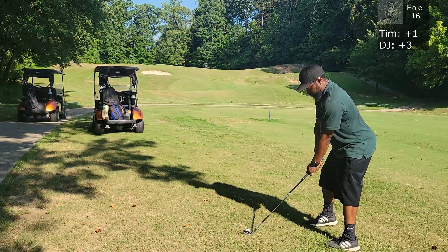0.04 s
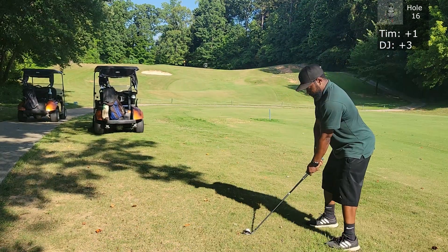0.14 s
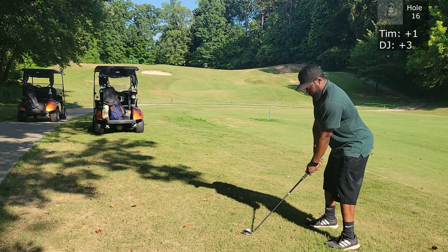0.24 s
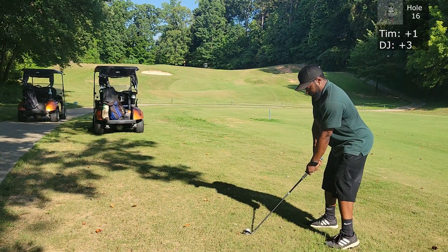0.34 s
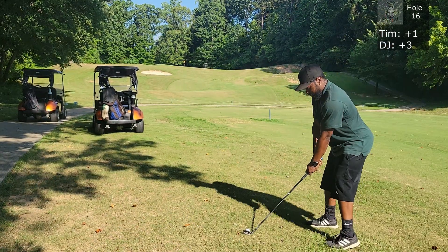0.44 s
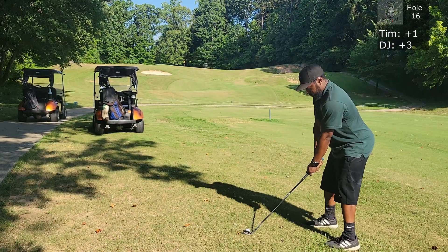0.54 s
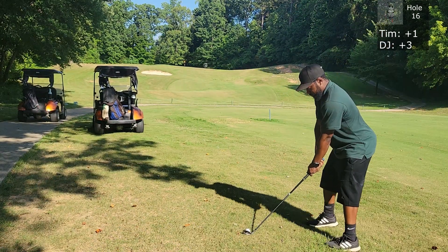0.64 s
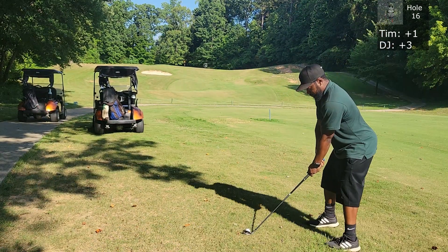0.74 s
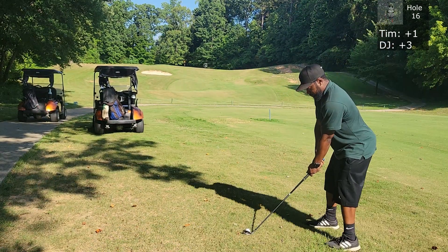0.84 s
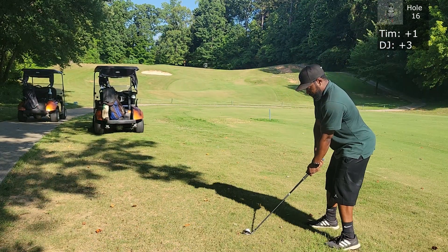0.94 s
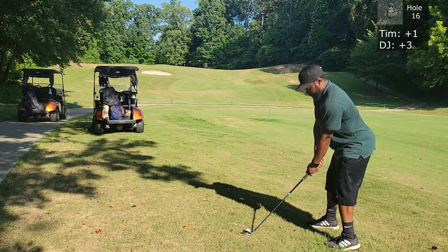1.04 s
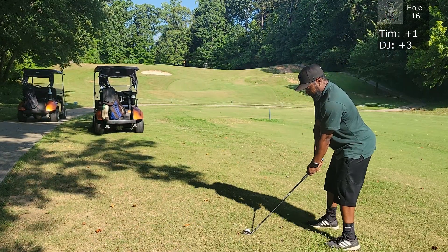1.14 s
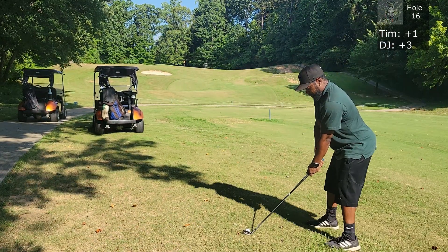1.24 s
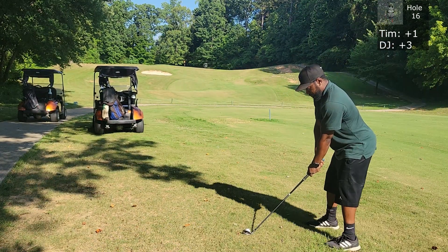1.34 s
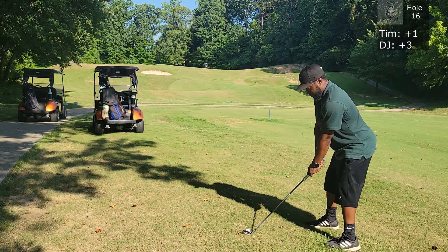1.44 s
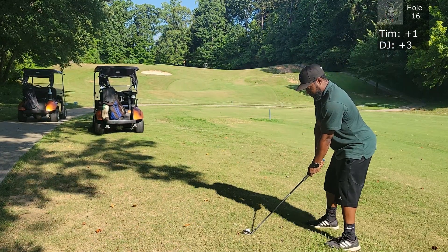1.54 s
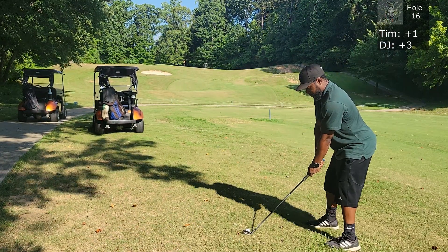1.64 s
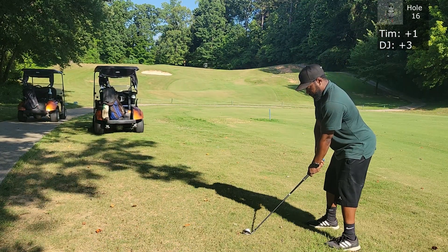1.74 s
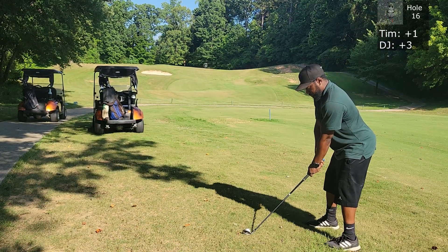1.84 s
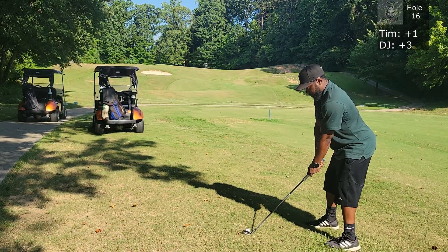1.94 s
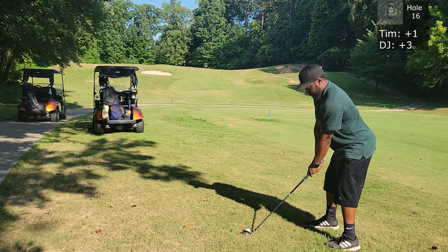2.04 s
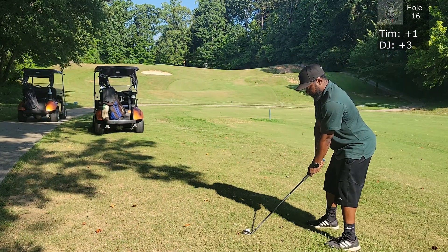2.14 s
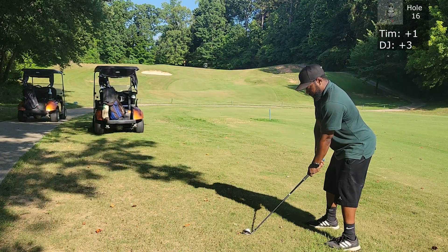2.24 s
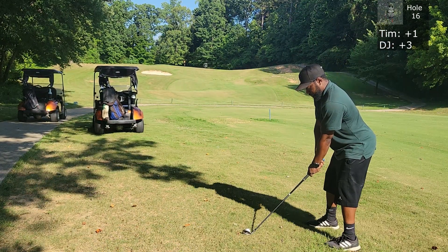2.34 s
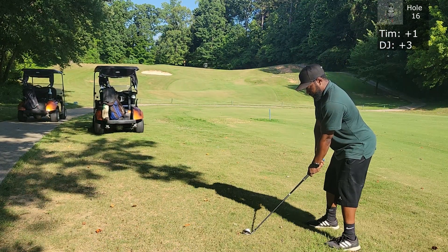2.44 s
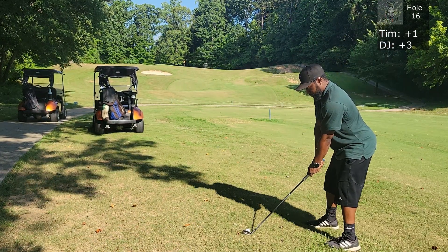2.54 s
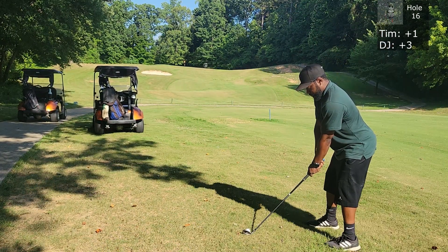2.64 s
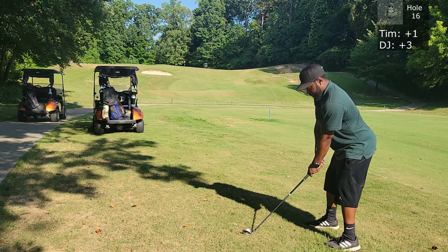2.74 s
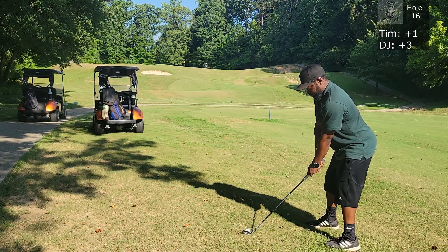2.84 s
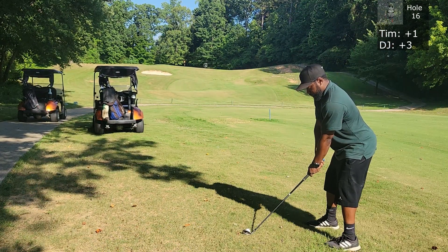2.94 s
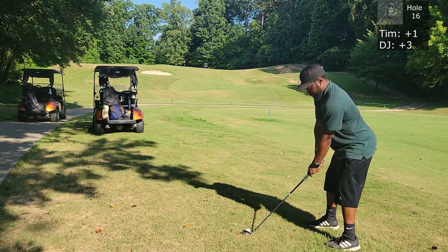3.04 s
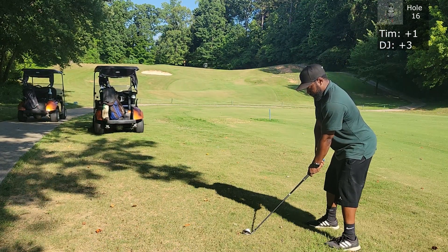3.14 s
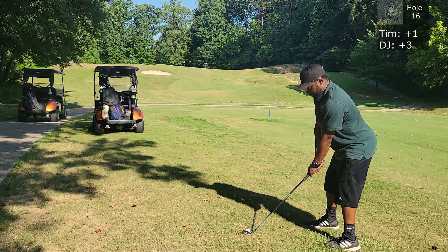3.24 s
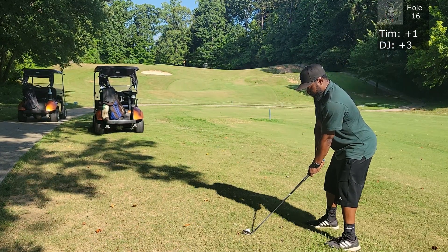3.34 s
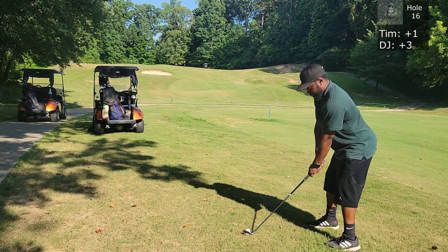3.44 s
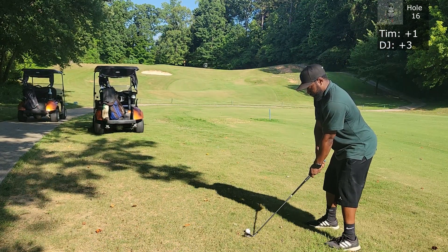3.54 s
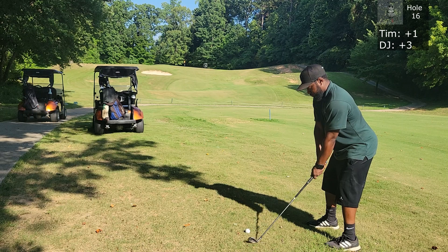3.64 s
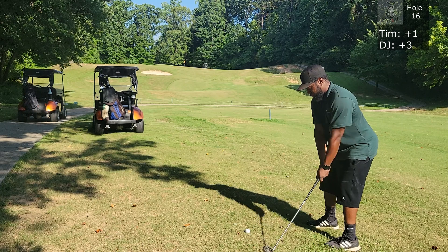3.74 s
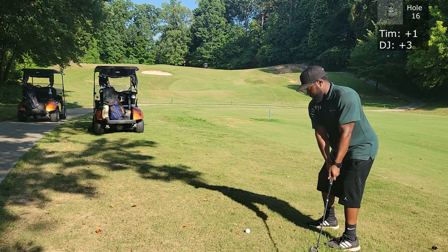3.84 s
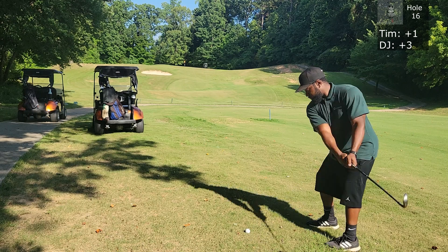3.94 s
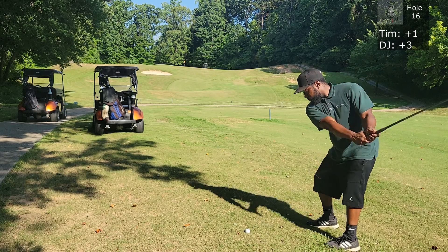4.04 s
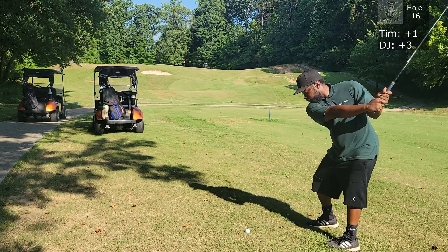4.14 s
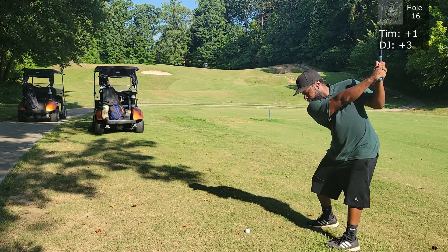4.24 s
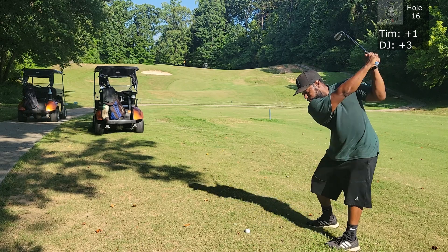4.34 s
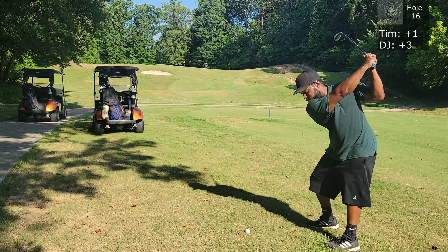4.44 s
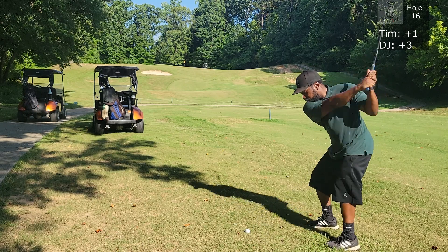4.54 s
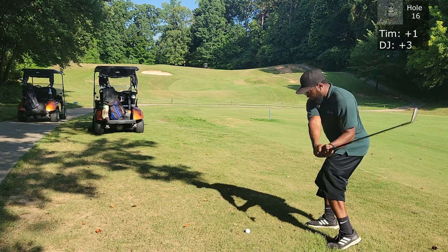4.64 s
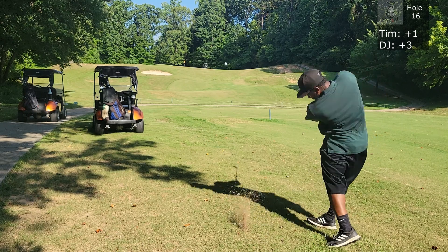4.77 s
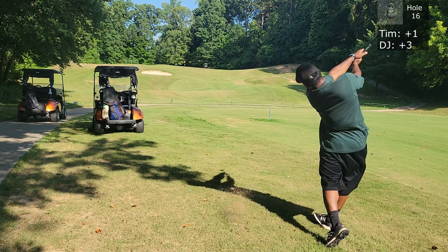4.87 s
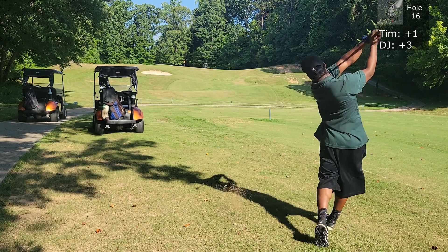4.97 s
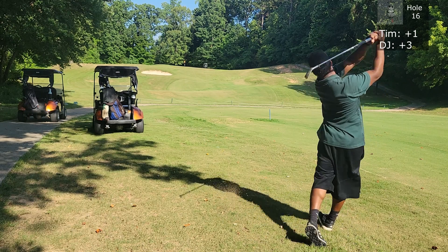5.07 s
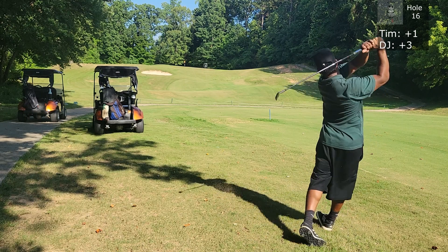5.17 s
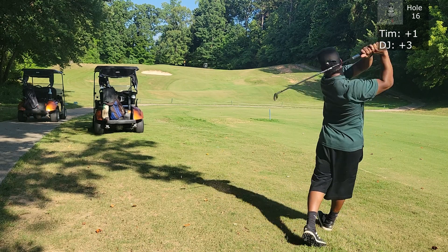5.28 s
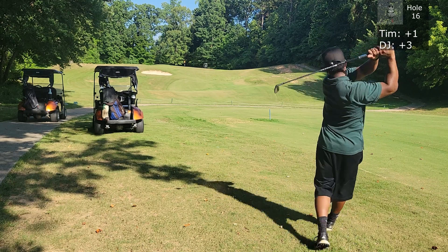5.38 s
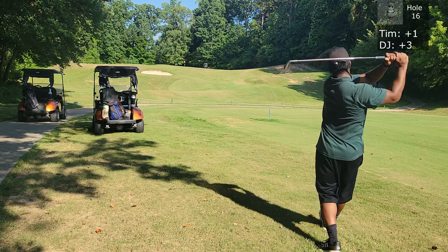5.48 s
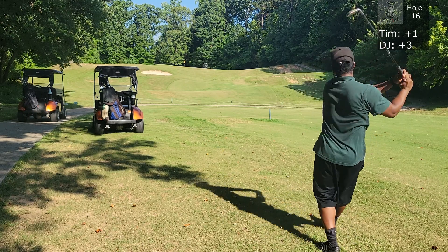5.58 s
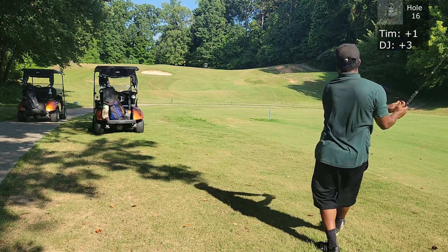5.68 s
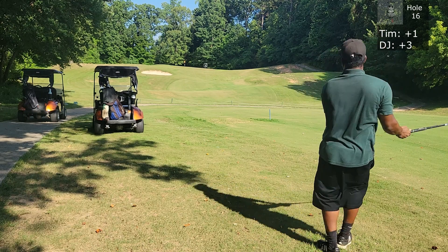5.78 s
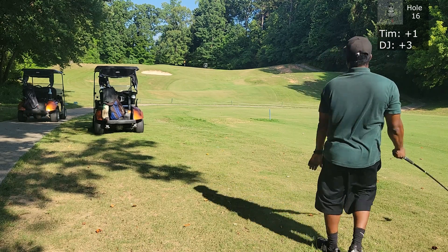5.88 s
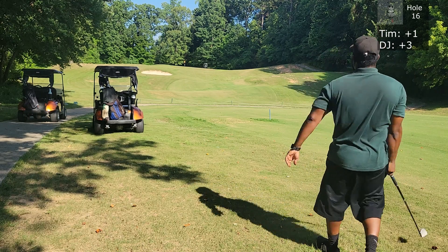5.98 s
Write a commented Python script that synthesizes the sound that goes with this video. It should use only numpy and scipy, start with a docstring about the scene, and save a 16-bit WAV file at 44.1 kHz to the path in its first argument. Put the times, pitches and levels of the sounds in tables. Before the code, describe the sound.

A golf iron swishes and cracks a ball off the turf, over summer insects, leaves and a faint idling engine.

```python
"""An iron strikes a golf ball off turf: the shaft sheds eddies and swishes, the impact rings the face with a
crack that the trees scatter back, the divot sprays, and air fizzes over the leaving ball. Around the summer
fairway a small engine idles far off, a cicada's tymbals swell on the right, a katydid's wings tick and buzz on
the left while a farther one buzzes between its songs, and leaves and a distant insect chorus hiss. One soft tap
on the grass comes before the swing."""
import sys
import numpy as np
from scipy import signal
from scipy.fft import rfft, irfft, next_fast_len
from scipy.io import wavfile
from scipy.ndimage import map_coordinates

SR = 44100
rng = np.random.default_rng(int(sys.argv[2]) if len(sys.argv) > 2 else 0)


def unload_audio(sound):
    """Save the sound as a 16-bit wav file, at the path given as the first command line argument."""
    columns = np.transpose(np.atleast_2d(sound))
    # keep every value between -1 and 1, then stretch to whole-number steps
    steps = np.round(np.clip(columns, -1, 1) * 32767)
    wavfile.write(sys.argv[1], SR, steps.astype(np.int16))


N = 265041
T = np.arange(N) / SR

# Coherence of a diffuse field at the two microphones: f/Hz, coherence
DIFFUSE_COHERENCE = [(60, 0.89), (300, 0.64), (1000, 0), (3000, 0), (8000, 0.0015)]
# Spectrum of leaves and far insects: f/Hz, relative level/dB
LEAF_SPECTRUM = [(120, -21), (200, -3.5), (223, -14), (366, -10.5), (464, -14), (929, -14), (2150, -22),
                 (3660, -22.5), (4810, -21.5), (6690, -25.5), (7890, -14.5), (9300, -36), (10200, -40.5),
                 (14200, -30), (15800, -35)]
# Balance of the leaves: f/Hz, left minus right/dB
LEAF_BALANCE = [(60, -1.0), (110, -6), (200, 0), (380, -3.5), (700, 0.5), (1290, -2), (2380, -0.5),
                (4400, -3), (8120, -1.5), (15000, 4)]
# Bands of a distant drone: f/Hz, width/Hz, gain per filter pass/dB
DRONE_BANDS = [(362, 116, -3), (780, 196, 1), (1203, 113, 0.5)]
# Bands of far cicadas: f/Hz, width/Hz, gain per filter pass/dB
CHORUS_BANDS = [(7025, 79, 9), (8044, 1010, 6.5)]
# Engine harmonics: multiple of the cycle rate, relative level/dB
ENGINE_ORDERS = [(4, -24), (5, -25), (6, -13), (7, -11), (8, -22), (9, 0), (10, -5), (11, -22), (12, -12),
                 (13, -18), (14, -17), (15, -20), (16, -16), (17, -24), (18, -15), (19, -22), (20, -17),
                 (21, -21), (22, -20), (24, -23)]
# Spectrum of the engine's rumble: f/Hz, relative level/dB
RUMBLE_SPECTRUM = [(20, -26), (35, -10), (55, -2.5), (80, 1.5), (120, -8.5), (190, -15), (240, -18.5),
                   (300, -41)]
# Slow drift of the idle: t/s, gain/dB
IDLE_GAIN = [(0, -47), (1.3, -47), (2.1, -46), (3.2, -48), (4.3, -48.5), (4.6, -47), (6.01, -47.5)]
# Katydid ticks, in quickening runs: t/s
TICK_TIMES = [.385, .4733, .5467, .609, .6669, .73, .7894, .865, 2.0228, 2.1045, 2.1939, 2.2623, 2.3236,
              2.393, 2.4558, 2.5178, 2.5726, 4.0761, 4.145, 4.2113, 4.275, 4.3331, 4.3909, 4.446, 4.504,
              4.5597]
# Katydid buzzes, the third from a farther katydid: start/s, rise/s, hold/s, level/dB
WING_BUZZES = [(.05, 1.0, .58, -64), (2.1, 0.46, 0.51, -65), (2.7, .3, 1.6, -68), (4.4, .45, .66, -64),
               (5.79, 0.019, .08, -64), (5.96, .02, .2, -63.5)]
# Spectrum of the katydid's wings: f/Hz, relative level/dB
WING_SPECTRUM = [(8500, -48), (10000, -20), (12000, -10), (13800, -3), (15700, -3.5), (15850, -99)]
# Resonances of the cicada's body: f/Hz, width/Hz, gain per filter pass/dB
CICADA_MODES = [(4010, 550, -2.5), (4900, 404, -0.5), (5570, 435, 1), (6025, 300, 0.5), (6520, 400, -3.5)]
# One cicada swell: t from the crest/s, level relative to the crest/dB, pulse rate/Hz
CICADA_SWELL = [(-.53, -16, 58), (-.36, -4.5, 69), (-.13, 0.5, 69), (0, -0.5, 75), (.1, -7.5, 73),
                (.33, -11.5, 70), (.45, -19, 94)]
# Crests of the swells: t/s, level/dB
CICADA_CRESTS = [(.26, -55.5), (1.42, -55), (2.56, -55), (3.68, -55), (4.82, -54.5), (5.97, -55)]
# Soft contact with the grass: t/s, level/dB, f/Hz
GRASS_TAPS = [(2.2, -35, 486)]
# Reverberation time of the tree line: f/Hz, T60/s
TREE_DECAY = [(200, 0.45), (2000, 0.67), (8000, 0.31), (16000, 0.3)]
# Spectrum of flying soil: f/Hz, relative level/dB
SOIL_SPECTRUM = [(530, -33), (900, -16), (1250, -15), (1420, -17.5), (3110, -3), (3380, -6.5), (3770, -7),
                 (6250, -11), (8550, -18), (13500, -17), (16000, -20)]
# Modes of club face and ball: f/Hz, level/dB, T60/s
FACE_MODES = [(680, -11.5, .028), (1050, -29, .03), (1250, -30, .02), (1900, -28, .02), (2450, -20, .022),
              (3400, -28, .008), (5000, -12, .004), (8100, -13, .003)]
# Reflections off ground and player: delay/s, left gain/dB, right gain/dB
REFLECTIONS = [(.0022, -20, -12), (.0032, -5.5, -20), (.0058, -17, -20)]

TOP_HZ, AIR_TOP_HZ = 16995, 15850  # band limits: whole scene; divot and tree echo
ENGINE_CYCLE_HZ = 9.03
BUZZ_HZ, BUZZ_RISE_DB, BUZZ_FALL_DB_PER_S = 53.2, 10.5, 150
TICK_DB, TICK_HOLD_S, TICK_T60 = -63, .006, .025
DIVOT_S, DIVOT_DB, DIVOT_HOLD_S, DIVOT_T60 = 4.797, -36.5, 0.024, 0.28
SETTLE_DB, SETTLE_T60 = -11.5, 0.97  # the divot's slow tail, relative to its burst
FIZZ_S, FIZZ_DB, FIZZ_RISE_S, FIZZ_HOLD_S, FIZZ_T60 = 4.808, -44, .012, .018, 0.38
FIZZ_HZ, SAG_HZ_PER_S = 3030, 2000
SPEED_UP_S, SPEED_KEPT, SLOW_DOWN_S = .15, .86, .2  # club speed before, at and after impact
EDDY_HZ, EDDY_DB, HISS_DB = 664, -41.5, -34.5  # at full speed; hiss level per band
EDDY_DB_PER_DECADE, HISS_DB_PER_DECADE = 30, 118  # growth with speed
PASS_S, SWUNG_PAST_DB = 0.031, -3.5  # time from impact for 1 dB of distance loss; step after impact
STRIKE_S = 4.7937
THUD_DELAY_S, THUD_HZ, THUD_WIDTH_S, THUD_DB = .0046, 200, .0022, -22.5


def amp(db):
    """Amplitude ratio of a level in dB."""
    return 10 ** (np.asarray(db) / 20)


def unit(x):
    """x normalised to rms 1."""
    return x / np.sqrt(np.mean(x ** 2) + 1e-20)


def pan(db):
    """Left and right gains for a left-minus-right level difference."""
    return amp([[db / 2], [-db / 2]])


def spectrum(table, hz):
    """Gain at hz, interpolated between (f/Hz, level/dB) points; silent outside them."""
    f, db = np.transpose(table)
    return amp(np.interp(np.log(hz + 1), np.log(f + 1), db, -120, -120))


def resonances(table, hz):
    """Response at hz of superposed damped resonators (f/Hz, width/Hz, gain/dB), alternating in sign."""
    return sum((-1) ** k * amp(db) * 1j * hz * width / (centre ** 2 - hz ** 2 + 1j * hz * width)
               for k, (centre, width, db) in enumerate(table))


def curves(rows):
    """Each column after the time, interpolated to one value per sample."""
    times, *columns = np.transpose(rows)
    return [np.interp(T, times, column) for column in columns]


def wobble(rate):
    """A smooth random curve with rate knots a second."""
    t = T[::max(1, int(SR / rate / 16))]
    knots = rng.standard_normal(int(N * rate / SR) + 4)
    return np.interp(T, t, map_coordinates(knots, [t * rate]))


def burst(start, rise, hold, t60):
    """Envelope of linear rise, hold and exponential decay."""
    t = T - start
    return np.clip(t / rise, 0, 1) * amp(-60 * np.clip(t - rise - hold, 0, None) / t60)


def pulsing(rate, depth, sharp):
    """Amplitude modulation, one swell a cycle, at a slightly unsteady rate."""
    cycles = np.cumsum(rate * (1 + 0.041 * wobble(32))) / SR
    return 1 - depth + 2 * depth * np.abs(np.sin(np.pi * cycles)) ** (2 * sharp)


def rough_tone(hz, width_hz, steady):
    """Narrow-band noise by quadrature modulation of a pitch curve, plus a steady carrier."""
    phase = 2 * np.pi * np.cumsum(hz) / SR
    return unit((steady + wobble(width_hz)) * np.sin(phase) + wobble(width_hz) * np.cos(phase))


def filtered(x, response):
    """Linear filtering: the spectrum of x times response(hz)."""
    size = next_fast_len(N + SR // 2)
    return irfft(rfft(x, size) * response(np.fft.rfftfreq(size, 1 / SR)), size)[..., :N]


def noise(coherence=None):
    """Stereo white noise of a given left-right coherence, by default that of a diffuse field."""
    def mid_side_gains(hz):
        f, diffuse = np.transpose(DIFFUSE_COHERENCE)
        alike = np.interp(np.log(hz + 1), np.log(f), diffuse) if coherence is None else [coherence]
        angle = np.arccos(alike) / 2
        return np.array([np.cos(angle), np.sin(angle)])
    mid, side = filtered(rng.standard_normal((2, N)), mid_side_gains)
    return np.array([mid + side, mid - side])


def ambience():
    """Diffuse field: leaves, a distant drone and far cicadas, each a noise of wandering level."""
    balance = lambda hz: pan(np.interp(hz, *np.transpose(LEAF_BALANCE)))[:, 0]
    leaves = amp(-56.5 + 0.78 * wobble(1.64))
    leaves = leaves * unit(filtered(noise(), lambda hz: spectrum(LEAF_SPECTRUM, hz) * balance(hz)))
    drone = amp(-64.5 + 1.3 * wobble(1.0))
    drone = drone * unit(filtered(noise(), lambda hz: resonances(DRONE_BANDS, hz) ** 2))
    chorus = unit(filtered(noise(), lambda hz: resonances(CHORUS_BANDS, hz) ** 2 * (hz < 8900)))
    chorus *= amp(-62 + .9 * wobble(5))
    return leaves + drone * pan(-1.36) + chorus * pan(5.0)


def engine():
    """Periodic firing gives harmonics that beat once a cycle, over rumble that throbs in step."""
    phase = 2 * np.pi * np.cumsum(ENGINE_CYCLE_HZ * (1 + 0.0027 * wobble(1.234))) / SR
    tones = np.zeros(N)
    for order, db in ENGINE_ORDERS:
        gain = amp(db + 1.2 * wobble(4))
        offset = rng.uniform(0, 2 * np.pi) + .4 * wobble(1.5)
        tones += gain * np.cos(order * phase + offset)
    rumble = filtered(noise(), lambda hz: spectrum(RUMBLE_SPECTRUM, hz))
    rumble = unit(rumble * (1 + 0.089 * np.cos(phase)))
    left, right = amp(curves(IDLE_GAIN)[0]) * (amp(2.0) * unit(tones) + amp(-6) * rumble) * pan(-1.16)
    return np.array([np.roll(left, -10), right])  # reaches the left side first


def katydid():
    """Stridulation: wing ticks quicken into a buzz, whose pulses deepen as it grows loud."""
    db = np.full(N, -120.)
    for start, rise, hold, top_db in WING_BUZZES:
        rise_db = np.interp(T, [start, start + rise], [-BUZZ_RISE_DB, 0], -120)
        fall_db = BUZZ_FALL_DB_PER_S * np.clip(T - start - rise - hold, 0, None)
        db = np.maximum(db, top_db + rise_db - fall_db)
    buzz = amp(db) * pulsing(BUZZ_HZ, depth=np.clip((db + 68.5) / 16, 0, .45), sharp=0.55)
    onsets = np.zeros(N)
    tick_samples = np.round(np.array(TICK_TIMES) * SR).astype(int)
    onsets[tick_samples] = amp(TICK_DB + 1.5 * rng.standard_normal(len(TICK_TIMES)))
    ticks = signal.fftconvolve(onsets, burst(0, 0.00076, TICK_HOLD_S, TICK_T60)[:SR // 10])[:N]
    envelope = np.hypot(buzz, ticks)  # powers add
    white = noise(coherence=0.12)
    wing = lambda hz: spectrum(WING_SPECTRUM, hz)
    return filtered(envelope * white, wing) / np.std(filtered(white, wing)) * pan(5.5)


def cicada():
    """Tymbal pulses of noise excite the resonances of the hollow body and quicken through each swell."""
    db, rate = curves([(crest_s + dt, crest_db + relative_db, pulse_hz)
                       for crest_s, crest_db in CICADA_CRESTS
                       for dt, relative_db, pulse_hz in CICADA_SWELL])
    pulses = noise(coherence=0.13) * pulsing(rate, depth=0.25, sharp=1.0)
    body = filtered(pulses, lambda hz: resonances(CICADA_MODES, hz) ** 2)
    return amp(db) * unit(body) * pan(-6.5)


def grass_tap(t60=0.0065):
    """A dull contact with the grass is one heavily damped oscillation."""
    out = np.zeros(N)
    for start, db, hz in GRASS_TAPS:
        t = np.clip(T - start, 0, None)
        out += amp(db - 60 * t / t60) * np.sin(2 * np.pi * hz * t)
    return out


def tree_echo(source):
    """Scattering from the tree line: a noise tail in which each frequency decays at its own rate."""
    hz, t, bands = signal.stft(rng.standard_normal((2, SR // 2)), SR, nperseg=256)
    t60 = np.interp(hz, *np.transpose(TREE_DECAY))[:, None]
    bands = bands * amp(-60 * t / t60) * (hz < AIR_TOP_HZ)[:, None]
    tail = signal.istft(bands, SR, nperseg=256)[1]
    delayed = np.pad(source, (200, 0))[None]
    return signal.fftconvolve(delayed, tail / np.linalg.norm(tail[0]), axes=1)[:, :N]


def divot():
    """Torn grass and flying soil: randomly modulated noise with a fast and a slow decay."""
    grit = amp(1.9 * np.array([wobble(700), wobble(700)]) + 0.51 * wobble(120))
    soil = lambda hz: spectrum(SOIL_SPECTRUM, hz) * (hz < AIR_TOP_HZ)
    spray = unit(filtered(noise(coherence=0.1) * grit, soil))
    tearing = burst(DIVOT_S, 0.0044, DIVOT_HOLD_S, DIVOT_T60)
    settling = amp(SETTLE_DB) * burst(DIVOT_S, 0.00397, DIVOT_HOLD_S, SETTLE_T60)
    return amp(DIVOT_DB) * (tearing + settling) * spray


def ball_flight():
    """Flow noise over the dimples of the leaving ball: a narrow band that fades and sinks in pitch."""
    hz = FIZZ_HZ - SAG_HZ_PER_S * np.clip(T - FIZZ_S, 0, .2)
    centre = rough_tone(hz, width_hz=450, steady=.4)
    sides = np.array([rough_tone(hz, width_hz=510, steady=.3) for _ in "LR"])
    envelope = amp(FIZZ_DB) * burst(FIZZ_S, FIZZ_RISE_S, FIZZ_HOLD_S, FIZZ_T60)
    return envelope * (0.65 * centre + 0.78 * sides)


def swing():
    """Vortex shedding: the shaft's rough tone is proportional to speed; the head hisses higher."""
    t = T - STRIKE_S
    downswing = np.exp(-np.abs(t) / SPEED_UP_S)
    follow_through = SPEED_KEPT * np.exp(-np.abs(t) / SLOW_DOWN_S)
    speed = np.where(t < 0, downswing, follow_through) + 1e-6
    hz = EDDY_HZ * speed
    eddies = rough_tone(hz, width_hz=220, steady=.6) * pan(1.5)
    eddies *= amp(EDDY_DB + EDDY_DB_PER_DECADE * np.log10(speed))
    low, high = [np.array([rough_tone(ratio * hz, width_hz=ratio * 900, steady=0) for _ in "LR"])
                 for ratio in (2.6, 6)]
    hiss = amp(HISS_DB + HISS_DB_PER_DECADE * np.log10(speed)) * (low + speed ** 6 * high)
    passing_db = -(t / PASS_S) ** 2 + SWUNG_PAST_DB * (t > 0)
    return amp(passing_db) * (eddies + hiss)


def strike():
    """Elastic impact: the ball squashes and rebounds in a millisecond, exciting the face's modes."""
    t = np.clip(T - STRIKE_S, 0, None)
    cycles = 900 * t + .5 * (1 - np.exp(-t / .0003))  # quick suction, slower push
    squash = -np.sin(2 * np.pi * cycles) * np.exp(-((t - .0004) / .0006) ** 2)
    ring = -sum(amp(db - 60 * t / t60) * np.sin(2 * np.pi * hz * t) for hz, db, t60 in FACE_MODES)
    crack = amp(-1.8) * squash + ring * (1 - np.exp(-t / .0004))
    out = np.array([np.roll(crack, 2) * amp(-1.5), crack])  # the right side is nearer
    for delay, left_db, right_db in REFLECTIONS:
        out += amp([[left_db], [right_db]]) * np.roll(crack, round(delay * SR))
    snap_bands = lambda hz: resonances([(2172, 3000, -1), (12500, 11300, -15.0)], hz)
    snap = unit(filtered(noise(coherence=0.18), snap_bands))
    out += amp(-13.0 - 60 * t / 0.015) * snap * (t > 0) * pan(1.5)
    thud_t = T - STRIKE_S - THUD_DELAY_S  # the sole pushes into the turf and lets go
    thud = -np.sin(2 * np.pi * THUD_HZ * thud_t) * np.exp(-(thud_t / THUD_WIDTH_S) ** 2)
    return out + amp(THUD_DB) * thud


def scene():
    """Superposition of all sources at the two microphones."""
    hit = strike()
    golf = hit + amp(-23.5) * tree_echo(hit[1]) + swing() + ball_flight() + divot() + grass_tap()
    return golf + engine() + ambience() + cicada() + katydid()


def record(dry):
    """Soft saturation rounds the loud peaks; a low-pass filter limits the band."""
    soft = dry / (1 + np.abs(dry / .92) ** 6) ** (1 / 6)
    return filtered(soft, lambda hz: np.clip((TOP_HZ - hz) / 80, 0, 1))


dry = scene()
out = record(dry)
unload_audio(out)
```